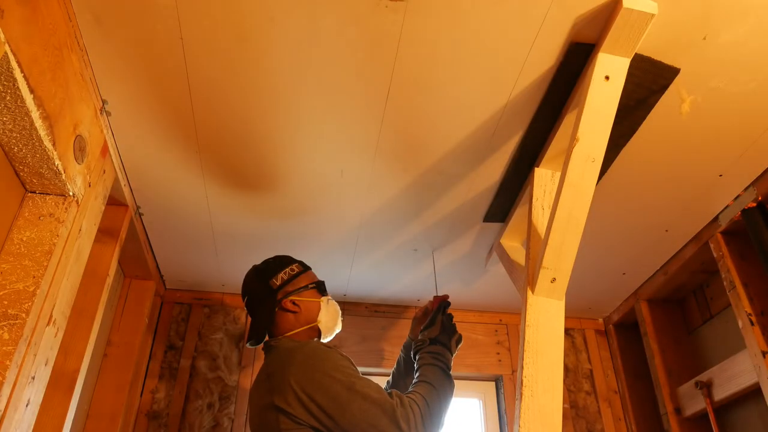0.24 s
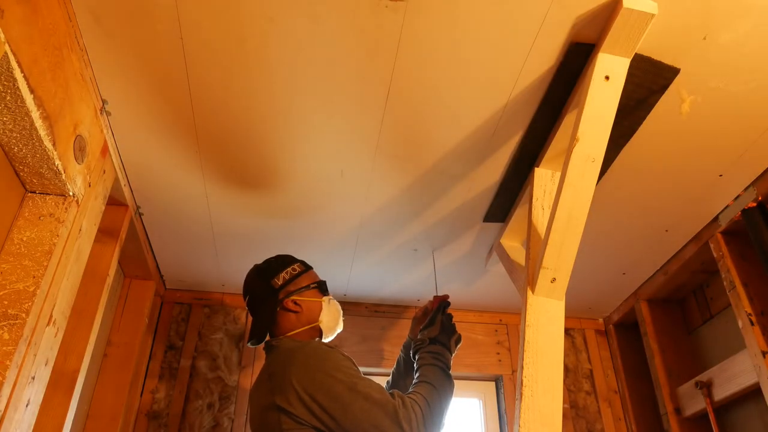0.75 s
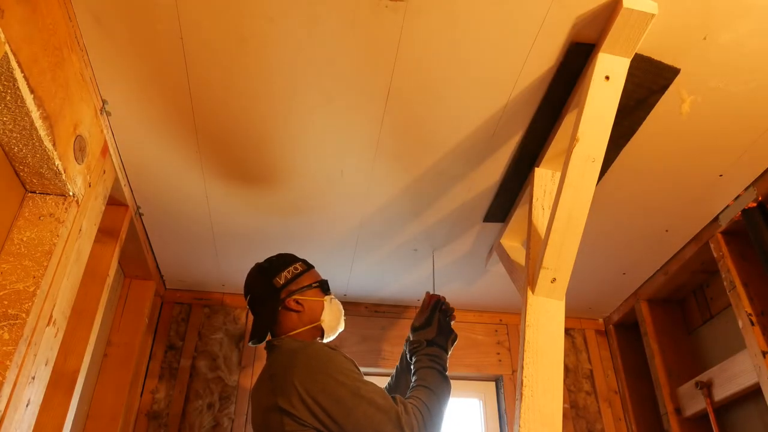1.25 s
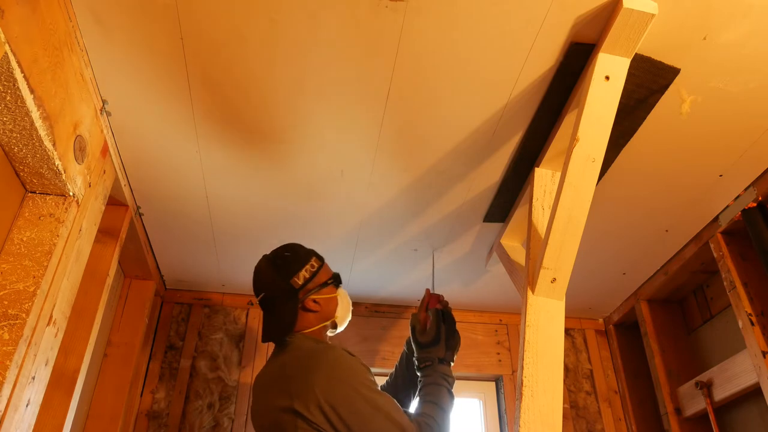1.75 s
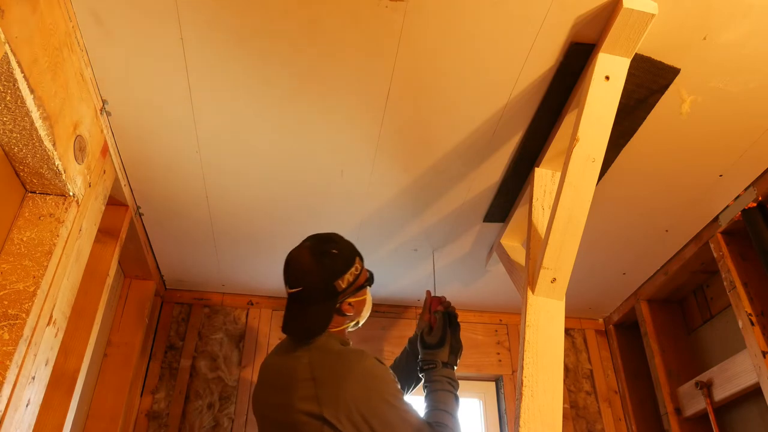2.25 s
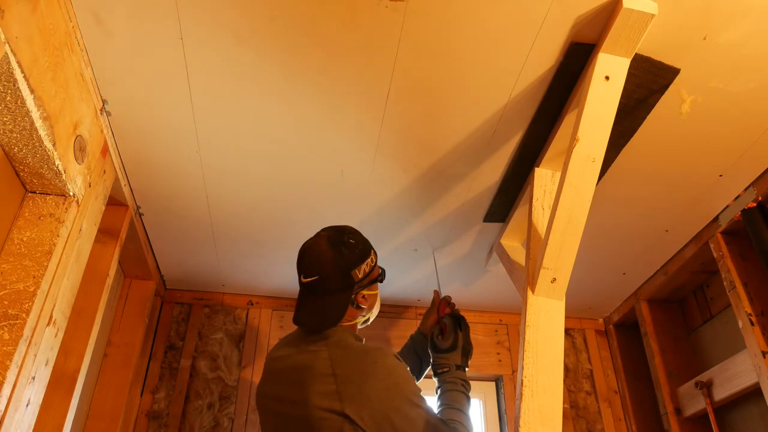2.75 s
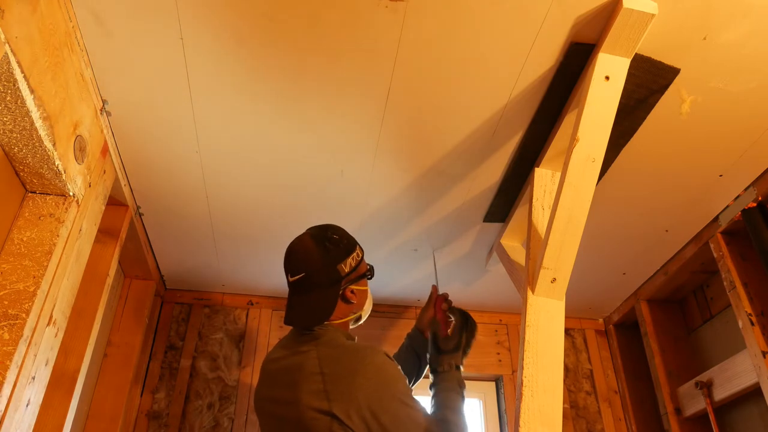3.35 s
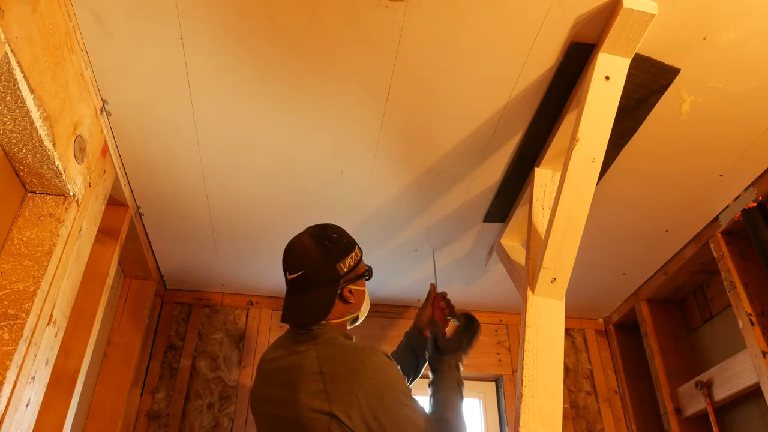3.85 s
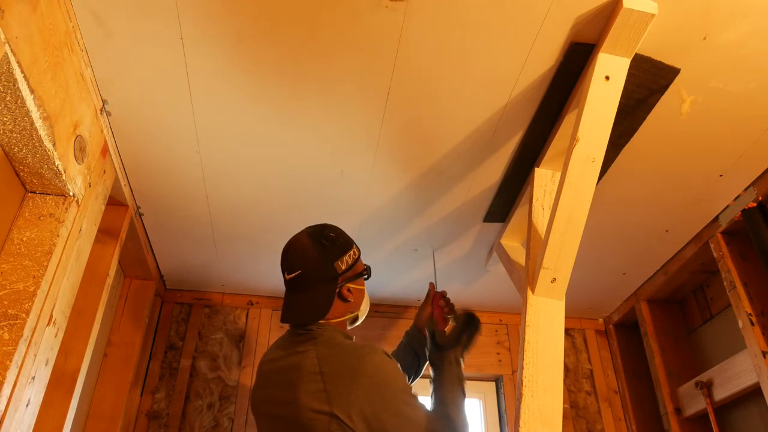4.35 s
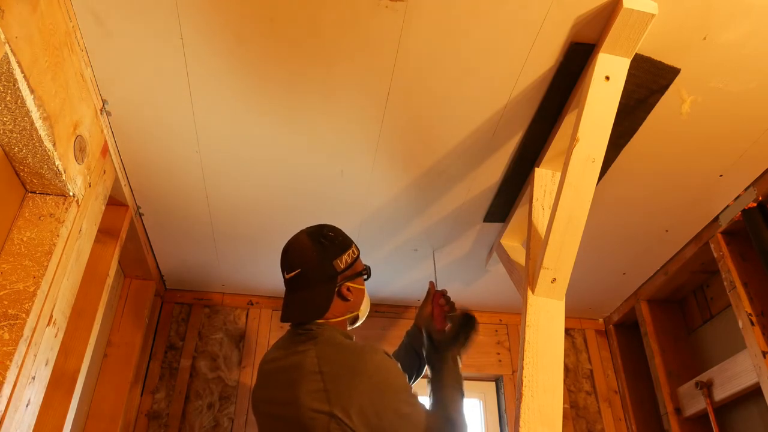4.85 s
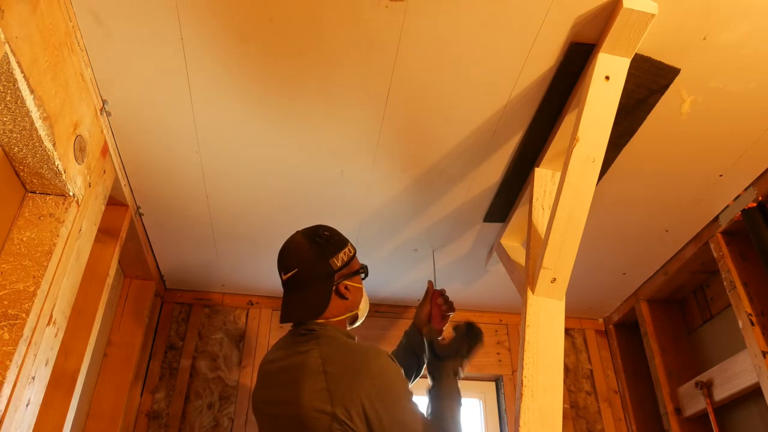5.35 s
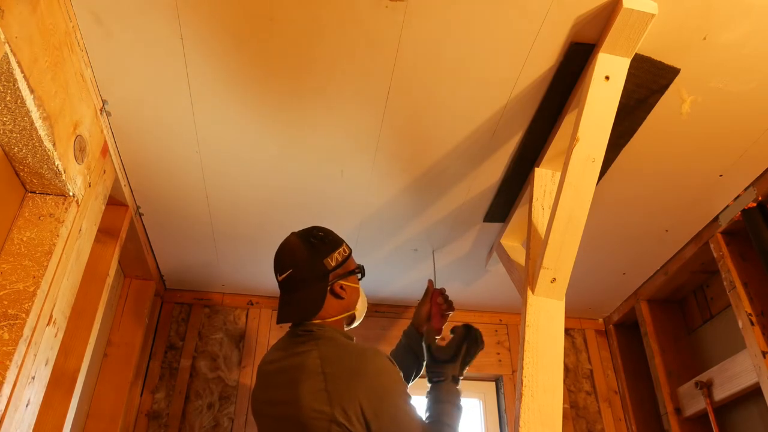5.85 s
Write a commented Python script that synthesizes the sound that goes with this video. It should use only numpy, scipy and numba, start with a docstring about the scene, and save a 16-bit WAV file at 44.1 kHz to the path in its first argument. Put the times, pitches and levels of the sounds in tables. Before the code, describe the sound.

In a bare room, sleeves rustle faintly, boots shuffle and a hand saw clinks in gloved hands, its tip grazing the drywall ceiling. About halfway through, twelve quick strokes drive the blade into the board, each a short chalky rasp with a knock and a slight squeak. They grow steadily harder, making the ceiling boom and some metal ring. The sound is fairly near, with a short echo.

```python
"""First, in a bare room, a drywall hand saw clinks in gloved hands while sleeves rustle and boots shuffle.
Its tip grazes the plasterboard ceiling. About three seconds in, twelve quick strokes begin to drive it in.
In each one the blade knocks in its slot and slides, then its teeth rasp through the gypsum (the board's
chalky core). The sheet booms and sets some metal ringing, and the blade drags back through the crumbs.
The strokes grow harder toward the end."""
import sys
import numpy as np
from scipy import signal
from scipy.fft import rfft, irfft, next_fast_len
from scipy.io import wavfile
from scipy.ndimage import uniform_filter1d
from numba import njit

SR = 44100
rng = np.random.default_rng(int(sys.argv[2]) if len(sys.argv) > 2 else 0)


def to_wav(sig):
    """Store sig (one row per channel, or 1-D mono) as 16-bit WAV at the path in sys.argv[1].

    Samples outside -1..1 are clipped; the rate is SR.
    """
    pcm = np.clip(np.atleast_2d(sig), -1, 1) * 32767
    pcm = np.round(pcm).astype(np.int16)
    wavfile.write(sys.argv[1], SR, pcm.T)  # frames by channels


N = 268585

# The tone of room air, cloth, steel ticks, the knock in the slot and cut gypsum: pitch_hz, level_db
AIR_TONE = [(15, -100), (25, -7.5), (160, -4), (183, -3.5), (482, -8), (666, -10.5), (826, -10), (997, -10),
            (1080, -13.5), (1340, -11), (1660, -17), (6550, -19.5), (12800, -20.5), (15500, -26)]
CLOTH_TONE = [(100, 0.5), (380, 13), (700, 2.5), (2000, 2), (5000, -4), (8000, -5), (10500, -6.5),
              (15000, -32)]
STEEL_TONE = [(40, -64), (150, -57), (300, 15), (900, -21.5), (2800, 10.5), (6000, 13.5), (8000, 21),
              (11000, 22.5), (15000, 15)]
KNOCK_TONE = [(200, 2), (700, -2), (1150, 2), (1450, -14), (2100, -33), (4000, -17), (10000, -15),
              (15000, -45)]
GYPSUM_TONE = [(200, 0), (400, -5.5), (600, -8), (850, -6), (1400, -11.5), (2000, -9.5), (3200, -16),
               (3700, -16.5), (4600, -23.5), (6000, -36.5), (8000, -38.5), (10000, -40.5), (15500, -60)]
# How long the room's echo takes to fade by 60 dB: pitch_hz, fade_s
ROOM_FADE = [(100, 0.73), (400, 0.58), (1200, 0.29), (3000, 0.17), (7000, 0.3), (14000, 0.12)]
# Sleeves rub most as the body turns: time_s, level_db
SLEEVE_LEVELS = [(.75, -81.5), (1.3, -69), (1.95, -62), (2.55, -69.5), (3.3, -67.5), (4, -71.5)]
# Gloves and boots bump: start_s, relative_level_db, pitch_hz
SOFT_BUMPS = [(.001, -58.5, 268), (.812, -67, 180), (0.867, -47, 295), (0.959, -65, 298),
              (1.096, -63.5, 270), (1.142, -64, 177), (1.459, -60, 243), (1.491, -62, 266),
              (1.527, -58.5, 229), (1.555, -67, 300), (1.627, -59, 189), (1.654, -69, 327),
              (1.79, -66, 310), (2.051, -57, 256), (2.12, -61, 312), (2.256, -62, 416), (2.348, -51.5, 274),
              (2.825, -58.5, 188), (2.879, -51.5, 292), (2.971, -57, 260)]
# The saw tip grazes the board's paper face: peak_s, level_db, rise_s
TIP_GRAZES = [(1.36, -66.5, 0.048), (2.689, -58, 0.015)]
# The loose saw clinks: start_s, relative_level_db, treble_db, fade_s, blade_ring_db
SAW_CLINKS = [(0.001, -65, -16, 0.021, -4.5), (0.874, -46, -6, 0.026, -2.5), (0.959, -55, -11, 0.024, -1.5),
              (1.464, -54.5, -23, 0.01, -13), (2.119, -51.5, -9.5, 0.025, -1),
              (2.776, -66, -21, 0.0084, -7), (2.866, -42.5, -12.5, 0.019, -6.5)]
# The notes each thing rings with when struck: pitch_hz, level_db, ring_s (time to fade by 60 dB)
BLADE_NOTES = [(900, -14, .04), (2600, -9, .03), (2730, -8, .03), (2850, -7, .04), (3400, -9, .025),
               (3850, -8, .025), (4750, -4, .03), (5030, 0, .045), (5200, -5, .03), (7040, -2, .06),
               (8750, -3, .025), (9350, 2, .03), (10100, -1, .03), (11600, 1, .035)]  # the saw blade, damped by the hand
SHEET_NOTES = [(46, -12, .4), (61, -5, .22), (77, -1, .22), (96, -4, .18), (118, -1, .27), (139, -6, .14),
               (155, 0, .15), (184, -9, .18), (222, -6, .28), (255, -6, .14), (300, -14, .3)]  # the whole ceiling sheet
METAL_NOTES = [(679, -8, .4), (1335, 1, .5), (1464, -4, .45), (1660, -5, .4), (1986, -9, .4),
               (2331, -9, .35)]  # metal shaken by the ceiling
BOARD_NOTES = [(400, 1, .14), (455, -1, .12), (567, -8, .1), (679, -7, .12), (796, 0, .1), (899, 1, .15),
               (1000, 1, .13), (1155, -1, .12), (1561, 0, .1), (1780, -1, .08), (2010, 2, .09),
               (2207, 0, .09), (2350, 5, .06), (2530, 6, .07), (2984, 5, .05), (3140, 8, .05),
               (3234, 7, .05), (3440, 7, .05), (4200, 7, .06), (4670, 9, .06)]  # the board close to the cut
# The blade scuffs on its way back out of the first cut: start_s, level_db
BLADE_SCUFFS = [(3.188, -54.5), (3.207, -58), (3.245, -52), (3.269, -57.5)]
# One row for each saw stroke, with relative levels. The "bite" is the moment the teeth catch.
#   bite_s, push_db, push_hz, push_delay_s, crunch_db, crunch_end_hz, bite_db, sizzle_db,
#   crumbs_db, unpitched_db, bite_length_s, run_up_s, slide_db, squeak_db, metal_db, free_ring_delay_s
SAW_STROKES = [ (3.093, -53, 234, 0.014, -52.5, 430, -43, -60.5, -10, -7, 0.02, 0.033, -61.5, -55.5, -71.5, 0.087),
               (3.41, -52, 243, 0.012, -52, 453, -39.5, -56, -22, -10.5, 0.022, 0.039, -59.5, -57, -76, 0.096),
               (3.643, -35.5, 217, 0.02087, -38, 408, -33, -48.5, -13, -8.5, 0.018, 0.02, -61, -57, -74, .11),
               (3.902, -35, 189, 0.01, -41.5, 427, -32, -45.5, -17, -1.5, 0.016, 0.028, -62.5, -52.5, -65.5, 0.08),
               (4.151, -33.5, 147, 0.014, -36.5, 447, -34.5, -46.5, -11.5, 11, 0.014, 0.022, -51, -50, -58.5, 0.089),
               (4.398, -30.5, 120, 0.0095, -36, 490, -29.5, -41.5, -11, 4, 0.0078, .024, -51.5, -44.5, -58, 0.13),
               (4.645, -29, 116, 0.011, -34.5, 474, -37, -45.5, -11, -3.5, 0.015, 0.024, -50, -50, -52, 0.063),
               (4.888, -28, 119, .011, -31, 554, -40, -42.5, -23, -2.5, 0.014, .021, -51, -49, -50, 0.093),
               (5.148, -24.5, 111, 0.00824, -28.5, 590, -28.5, -38, -8, 10, .012, 0.013, -43.5, -38.5, -47, 0.174),
               (5.413, -23.5, 116.5, 0.0079, -26.5, 660, -27.5, -37, -15, 6, 0.0085, 0.019, -47, -43, -43, .1),
               (5.676, -22.5, 114, 0.0082, -27.5, 674, -30, -37.5, -16, 15, 0.007, 0.012, -45, -41.5, -43, 0.1),
               (5.954, -23.5, 139, 0.0116, -23.5, 810, -21, -35.5, -21, -5, 0.0077, 0.018, -45.5, -37, -47.5, 0.1)]
# A harder push makes the sheet ring more: push_db, ring_db
RING_BY_PUSH = [(-25.5, -3.5), (-17, 2.5)]
# How loudly the blade drags back through the crumbs: push_db, drag_db
DRAG_BY_PUSH = [(-34, -73), (-25.5, -44), (-15, -61.5)]
# How loudly the gypsum cracks: push_db, crack_db
CRACK_BY_PUSH = [(-41, -55.5), (-29, -46), (-21, -33)]


def undb(db):
    """Turn decibels into a number to multiply a sound by."""
    return 10 ** (np.asarray(db) / 20)


def look_up(table, x):
    """Read between the rows of a two-column table."""
    return np.interp(x, *np.transpose(table))


def at_pitch(table, hz):
    """Read a (pitch_hz, value) table, giving every octave the same space."""
    pitches, values = np.transpose(table)
    return np.interp(np.log(hz + 1), np.log(pitches), values)


def colour(x, tone):
    """Make the lows and highs of x louder or softer, following a (pitch_hz, level_db) table."""
    n = next_fast_len(2 * len(x), True)
    gains = undb(at_pitch(tone, np.fft.rfftfreq(n, 1 / SR)))
    cepstrum = irfft(np.log(gains), n)
    # folding this in half keeps the filter from sounding before its input does
    cepstrum[1:n // 2] *= 2
    cepstrum[n // 2 + 1:] = 0
    return irfft(rfft(x, n) * np.exp(rfft(cepstrum)), n)[:len(x)]


def band(x, lo_hz, hi_hz, order=2):
    """Keep the part of x between two pitches."""
    edges = [lo_hz, min(hi_hz, SR / 2 - 100)]
    return signal.sosfilt(signal.butter(order, edges, "band", fs=SR, output="sos"), x)


@njit
def sweep(x, hz, width):
    """Keep a band around a moving pitch; the width is a share of that pitch."""
    out, band_state, low_state = np.empty(len(x)), 0., 0.
    for i in range(len(x)):
        g = np.tan(np.pi * hz[i] / SR)
        passed = (band_state + g * (x[i] + 1e-18 - low_state)) / (1 + g * (g + width))
        band_state = 2 * passed - band_state
        low_state += 2 * g * passed
        out[i] = width * passed
    return out


def give_pitch(x, hz, width, unpitched_db):
    """Bring out a moving pitch in a noise, and mix some of the plain noise back in."""
    return sweep(sweep(x, hz, width), hz, width) + undb(unpitched_db) * x


def ring(x, notes):
    """Let x shake an object that rings with these fading notes."""
    t = np.arange(len(x)) / SR
    response = sum(undb(db) * np.sin(2 * np.pi * hz * t) * np.exp(-np.log(1000) * t / ring_s)
                   for hz, db, ring_s in notes)
    return signal.fftconvolve(x, response)[:len(x)]


def burst(x, db=0):
    """Scale a short sound so that its loudest 30 ms have this level."""
    return x * undb(db) / np.sqrt(uniform_filter1d(x * x, int(.03 * SR)).max())


def steady(x):
    """Scale a sound to an average power of 1."""
    return x / np.sqrt(np.mean(x * x))


def grains(count, spread_db):
    """Gritty noise: tiny fractures of uneven size, each under a millisecond long."""
    sizes = undb(spread_db * rng.standard_normal(count // 32 + 1))
    return steady(np.repeat(sizes, 32)[:count] * rng.standard_normal(count))


def tremble(count, rate_hz, depth_db):
    """A multiplier that wanders quickly and smoothly around 1."""
    wander = signal.sosfilt(signal.butter(2, rate_hz, fs=SR, output="sos"), rng.standard_normal(count))
    return undb(depth_db * steady(wander))


def swell(t, rise_s, fall_s):
    """A level that grows until t = 0 and then fades."""
    return np.exp(np.minimum(t, 0) / rise_s - np.maximum(t, 0) / fall_s)


def bite_shape(t, rise_s, length_s):
    """The level of a bite: the teeth catch quickly, hold, and stop with the arm."""
    return np.exp(np.minimum(t, 0) / rise_s - (np.maximum(t, 0) / length_s) ** 2)


def falling_pitch(t, first_hz, last_hz, fall_s):
    """A pitch that slides down after t = 0."""
    return last_hz + (first_hz - last_hz) * np.exp(-(np.maximum(t, 0) / fall_s) ** 2)


def add(track, start_s, x):
    """Mix x into the track at this time."""
    start = int(start_s * SR)
    x = x[max(-start, 0):N - start]
    track[max(start, 0):max(start, 0) + len(x)] += x


def air():
    """Quiet room air and microphone hiss, spread wide between left and right: widest around 300 Hz and
    narrowest in the top treble."""
    mid, side = (steady(colour(rng.standard_normal(N), AIR_TONE)) for _ in range(2))
    side = colour(side, [(60, 1.5), (300, 13.5), (3000, 3.0), (12000, -5.5)])
    return undb(-67.5) * np.array([mid + side, mid - side])


def room(x, tail_db, early_db, side_early_db):
    """Nearby studs and walls throw back early echoes; a short tail follows, lasting longest in the bass."""
    t = np.arange(int(.7 * SR)) / SR
    edges = np.geomspace(40, 16000, 11)
    fade_in = np.clip((t - .002) / .00062, 0, 1)

    def echoes(scatter_db):
        """One random set of echoes of x."""
        noise, tail = rng.standard_normal(len(t)), 0
        for lo, hi in zip(edges, edges[1:]):
            fade_s = at_pitch(ROOM_FADE, np.sqrt(lo * hi))
            tail += band(noise, lo, hi, order=3) * np.exp(-np.log(1000) * t / fade_s)
        early = band(rng.standard_normal(len(t)), 170, 17000) * np.exp(-t / .0038)
        response = (undb(tail_db) * tail + undb(scatter_db) * early) * fade_in / np.sqrt(SR / 20)
        return signal.fftconvolve(x, response)[:N]

    mid = x + echoes(early_db)
    # echoes from the side walls set left and right apart, though hardly in the bass
    side_tone = [(60, -16), (130, -19), (260, -10), (500, -11), (2000, -9.5), (7000, -10), (12000, -5)]
    side = colour(echoes(side_early_db), side_tone)
    return np.array([mid + side, mid - side])


def bumps():
    """Gloves and boots bump: a dull thud with a short scuff."""
    out, t = np.zeros(N), np.arange(SR // 5) / SR
    for start_s, db, hz in SOFT_BUMPS:
        thud = band(np.sin(2 * np.pi * hz * t) * swell(t - .002, .0017, .0071), 142, 640)
        scuff = band(rng.standard_normal(len(t)) * np.exp(-t / .034), hz * .6, hz * 1.17)
        add(out, start_s, burst(burst(thud, -.58) + burst(scuff), db + 1))
    return out


def sleeves():
    """Cloth rubs and rustles as the arms move."""
    level = undb(look_up(SLEEVE_LEVELS, np.arange(N) / SR))
    return level * steady(colour(grains(N, .86), CLOTH_TONE)) * tremble(N, 23, .83)


def boots(peak_s=1.71, level_db=-66.5):
    """Boots shift on the floor with a low shuffle as the body turns."""
    t = np.arange(N) / SR
    return undb(level_db) * swell(t - peak_s, .4, .08) * steady(band(grains(N, 2.4), 46, 287))


def grazes():
    """The saw tip brushes the board's paper face before the first stroke."""
    t = np.arange(N) / SR
    touch = sum(undb(db) * swell(t - peak_s, rise_s, .026) for peak_s, db, rise_s in TIP_GRAZES)
    scratch = steady(band(grains(N, 3), 1500, 3130))
    rub = steady(band(grains(N, 3.1), 180, 860))
    return touch * (scratch + undb(-3) * rub)


def clinks():
    """The loose saw's steel chatters for a moment and the blade rings."""
    out, t = np.zeros(N), np.arange(SR // 3) / SR - .01
    for start_s, db, treble_db, fade_s, ring_db in SAW_CLINKS:
        chatter = grains(len(t), 1) * swell(t - .002, .0025, fade_s)
        clink = burst(colour(chatter, STEEL_TONE)) + burst(ring(chatter, BLADE_NOTES), ring_db)
        clink = colour(clink, [(2000, 0), (10000, treble_db)])
        add(out, start_s + t[0], burst(clink, db - 1.5))
    return out


def metal_ring(hold_s=.077, detune=.0015):
    """Each stroke shakes some metal through the ceiling, and it rings and rattles."""
    out, t = np.zeros(N), np.arange(SR) / SR - .02
    for bite_s, *_, length_s, _, _, _, metal_db, free_delay_s in SAW_STROKES:
        shake = np.exp(-((t - length_s) * 5000) ** 2)
        notes = np.array(METAL_NOTES) * [1 + detune * rng.standard_normal(), 1, 1]
        # passing through the notes twice makes the ring swell after the blow
        ringing = ring(ring(shake, notes), notes) * tremble(len(t), 70, 2.5)
        # it rings freely for hold_s on either side of its free moment
        freedom = .22 + .78 * np.exp(-((t - free_delay_s) / hold_s) ** 6)
        rattle = band(grains(len(t), 1.7), 710, 1900) * swell(t - .085, .16, .065)
        rattle *= tremble(len(t), 30, 1.8)
        add(out, bite_s + t[0], burst(ringing * freedom, metal_db) + burst(rattle, metal_db - 2))
    return out


def sheet_booms(detune=.028):
    """Each stroke shoves the ceiling sheet, which springs back, judders and booms."""
    out, t = np.zeros(N), np.arange(SR) / SR - .02
    for bite_s, push_db, hz, delay_s, *_ in SAW_STROKES:
        phase = 2 * np.pi * hz * (t - delay_s)
        shove = -phase * np.exp(-phase * phase / 2)
        judder = band(rng.standard_normal(len(t)), hz * .65, hz * 1.9) * swell(t - delay_s, .006, .022)
        force = burst(shove) + burst(judder, -.78)
        # the blade's pressure puts the sheet a little out of tune each time
        notes = [(f * (1 + detune * rng.standard_normal()), db, ring_s) for f, db, ring_s in SHEET_NOTES]
        # a light stroke moves only a patch of board: less ringing and less bass
        boom = burst(ring(force, notes), look_up(RING_BY_PUSH, push_db)) + burst(force, -.49)
        lowest_hz = np.interp(push_db, [-35, -33], [90, 38])
        add(out, bite_s + t[0], burst(band(boom, lowest_hz, 700), push_db + 1.8))
    return out


def scuffs():
    """The flat of the blade drags dully on the gypsum."""
    out, t = np.zeros(N), np.arange(SR // 5) / SR
    for start_s, db in BLADE_SCUFFS:
        scuff = colour(grains(len(t), 3.2), GYPSUM_TONE) * swell(t - .006, .0025, .015)
        add(out, start_s, burst(band(scuff, 180, 750), db))
    return out


def drags():
    """After each bite the blade scrapes back through the crumbs in fits and starts."""
    out, t = np.zeros(N), np.arange(SR // 3) / SR
    for bite_s, push_db, *_ in SAW_STROKES:
        scrape = grains(len(t), 2.8) * swell(t - .041, .056, .085) * tremble(len(t), 45, 1.2)
        scrape = band(colour(scrape, GYPSUM_TONE), 1050, 7800)
        add(out, bite_s, burst(scrape, look_up(DRAG_BY_PUSH, push_db)))
    return out


def run_ups(turn_ahead_s=.031, chirp_hz=1570, hiss_growth_db=5):
    """Before each bite the blade chirps as the arm turns, knocks in its slot, hisses and squeaks."""
    out, t = np.zeros(N), np.arange(SR // 6) / SR - .05
    for bite_s, push_db, *_, run_up_s, slide_db, squeak_db, _, _ in SAW_STROKES:
        chirp = band(grains(len(t), 2), chirp_hz / 1.13, chirp_hz * 1.13) * np.exp(-(t / .009) ** 2)
        chirp_db = push_db + np.interp(push_db, [-30, -24], [-40, -31])
        add(out, bite_s - turn_ahead_s + t[0], burst(chirp, chirp_db))
        knock = colour(grains(len(t), 6.9) * (t > 0) * swell(t, .001, .013), KNOCK_TONE)
        sliding = (t > 0) * np.exp(-np.maximum(t - run_up_s, 0) / .004)
        # the hiss grows as the blade gathers speed
        speed = undb(hiss_growth_db * np.clip(t / run_up_s, 0, 1))
        hiss = band(colour(grains(len(t), 2.2) * sliding * speed, GYPSUM_TONE), 2450, 12000, order=1)
        # the squeak falls, and sits a little higher or lower on each stroke
        squeak_hz = falling_pitch(t, 1500, 975, .43 * run_up_s) * (1 + .046 * rng.standard_normal())
        rub = grains(len(t), 1.5) * sliding * swell(t, .001, .27)
        squeak = give_pitch(rub, squeak_hz * tremble(len(t), 125, .67), width=.3, unpitched_db=-28)
        squeak = burst(band(squeak, 550, 7000), squeak_db)
        add(out, bite_s - run_up_s + t[0], burst(hiss, slide_db) + burst(knock, slide_db - .5) + squeak)
    return out


def cracks(delay_s=.003, fade_s=.0033):
    """The gypsum snaps as the teeth catch, louder under a hard push."""
    out, t = np.zeros(N), np.arange(SR // 20) / SR
    for bite_s, push_db, *_ in SAW_STROKES:
        snap = band(colour(grains(len(t), 1.5) * np.exp(-t / fade_s), GYPSUM_TONE), 680, 6900)
        add(out, bite_s + delay_s, burst(snap, look_up(CRACK_BY_PUSH, push_db)))
    return out


def teeth(teeth_per_s=369.7):
    """The teeth rasp and sizzle through the gypsum, the board crunches, and crumbs trail off."""
    out, t = np.zeros(N), np.arange(SR // 3) / SR - .04
    for bite_s, _, _, _, *cutting in SAW_STROKES:
        crunch_db, crunch_end_hz, bite_db, sizzle_db, crumbs_db, unpitched_db, length_s, *_ = cutting
        # teeth catch one after another at an uneven pace
        tooth_phase = np.cumsum(teeth_per_s * tremble(len(t), 200, 3)) / SR % 1
        catching = .65 + np.exp(-tooth_phase / .25)
        biting = bite_shape(t - .001, .002, length_s) * catching
        crumbs = undb(crumbs_db) * swell(t - .012, .005, .023) * tremble(len(t), 130, 3)
        stopping = bite_shape(t - .3 * length_s, .002, 1.35 * length_s)
        crunch = band(grains(len(t), 3.8) * (stopping + 2.2 * crumbs), 304, 1730, order=3)
        rasp = band(grains(len(t), 2.1) * (biting + crumbs), 1300, 5500, order=3)
        # the finest grit is loudest partway through the bite
        sizzling = swell(t - .29 * length_s, .38 * length_s, 1.2 * length_s) * catching
        grit = band(grains(len(t), 2.2) * (sizzling + crumbs), 5500, 15500, order=3)
        cut = burst(colour(grit, GYPSUM_TONE), sizzle_db)
        # crunch and rasp fall in pitch as the blade slows, and both ring the board around the cut
        crunch_hz = falling_pitch(t, 995, crunch_end_hz, .011)
        rasp_hz = falling_pitch(t, 3200, 2400, .017)
        crunch = give_pitch(colour(crunch, GYPSUM_TONE), crunch_hz, .32, unpitched_db)
        rasp = give_pitch(colour(rasp, GYPSUM_TONE), rasp_hz, .51, unpitched_db)
        for part, ring_db, db in [(crunch, -7, crunch_db), (rasp, -3, bite_db - 6)]:
            cut += burst(burst(part) + burst(ring(part, BOARD_NOTES), ring_db), db)
        add(out, bite_s + t[0], cut)
    return out


def scene():
    """Handling, the shaken ceiling and the saw, each with its own echoes, over the room air."""
    handling = bumps() + sleeves() + boots() + grazes() + clinks()
    ceiling = metal_ring() + sheet_booms()
    sawing = scuffs() + drags() + run_ups() + cracks() + teeth()
    return (air()
            + room(handling, tail_db=-3.5, early_db=17.5, side_early_db=22.5)
            + room(ceiling, tail_db=-6, early_db=-15, side_early_db=22)
            + room(sawing, tail_db=-3, early_db=-39, side_early_db=21.5))


def record(dry):
    """The microphone has a narrow dip in the treble and cuts off steeply above 15500 Hz."""
    dipped = dry - .75 * band(dry, 7600, 8100, order=1)
    return signal.sosfilt(signal.ellip(8, .2, 70, 15500, fs=SR, output="sos"), dipped)


dry = scene()
out = record(dry)
to_wav(out)
```